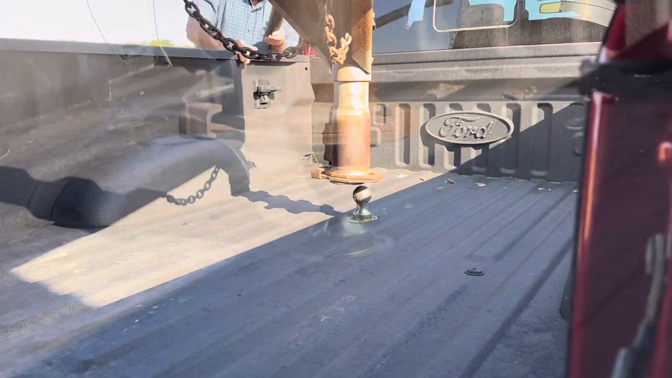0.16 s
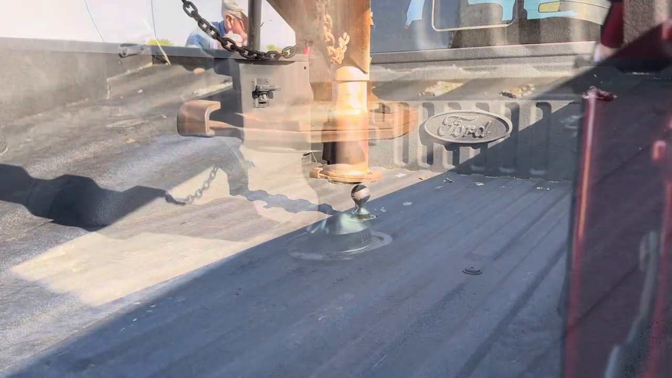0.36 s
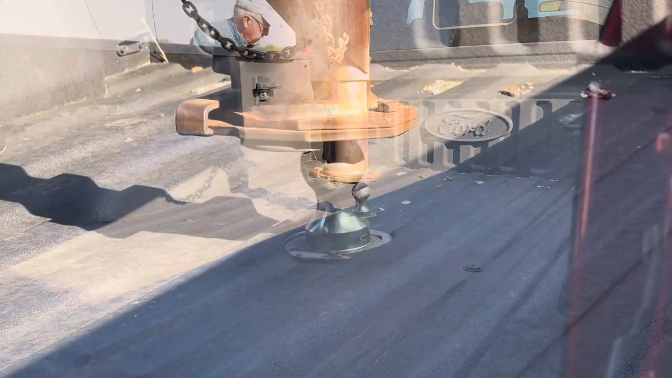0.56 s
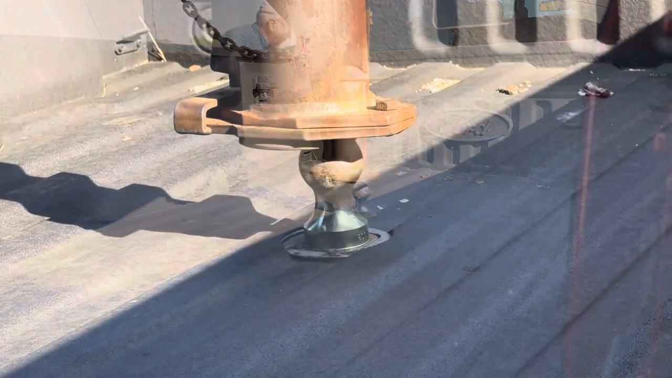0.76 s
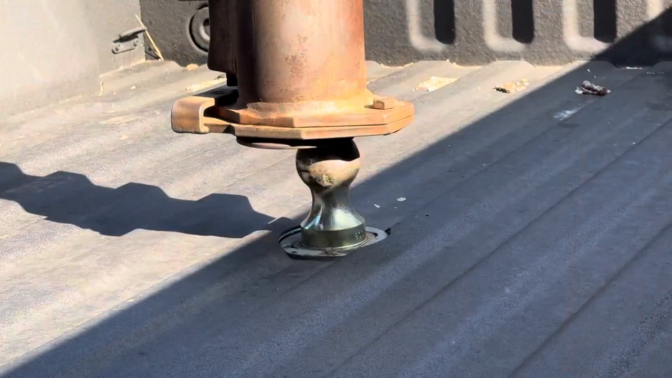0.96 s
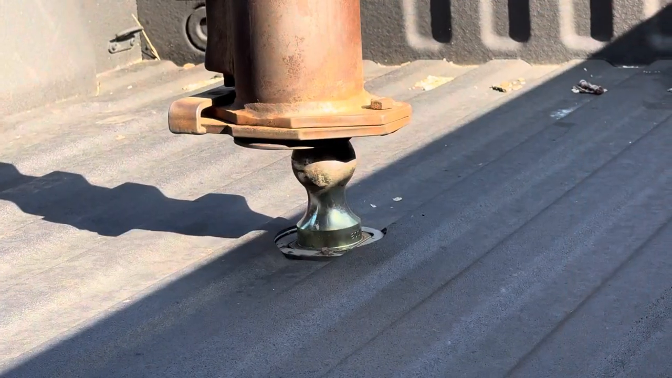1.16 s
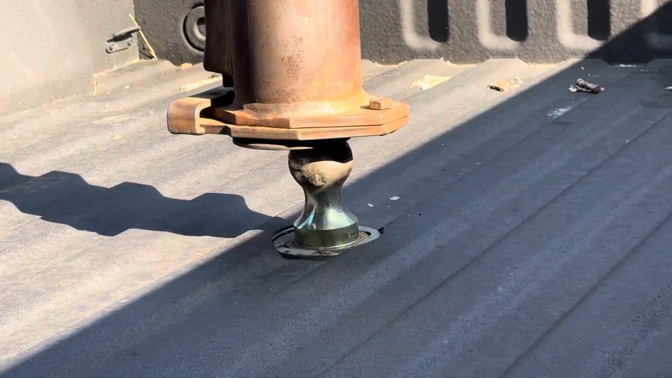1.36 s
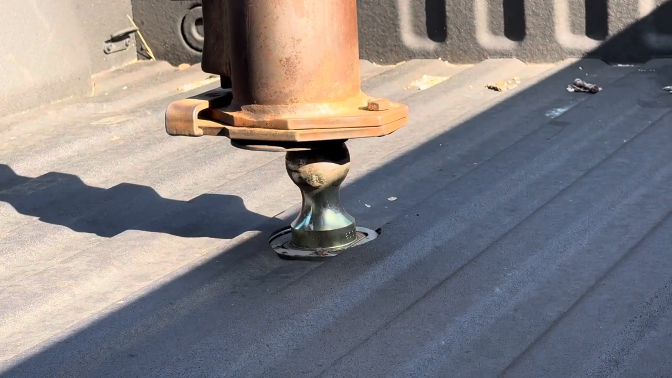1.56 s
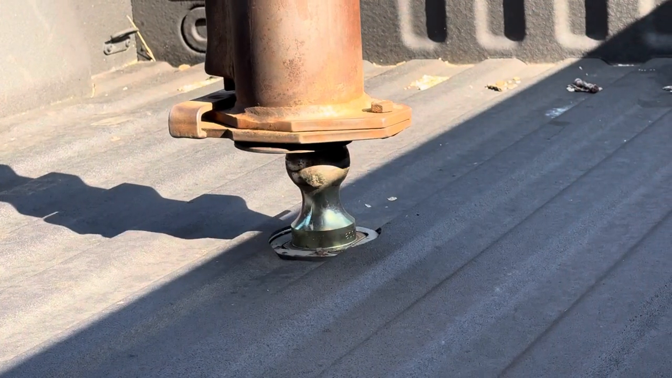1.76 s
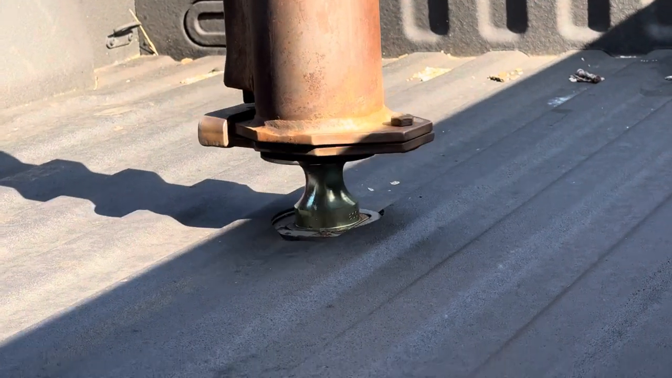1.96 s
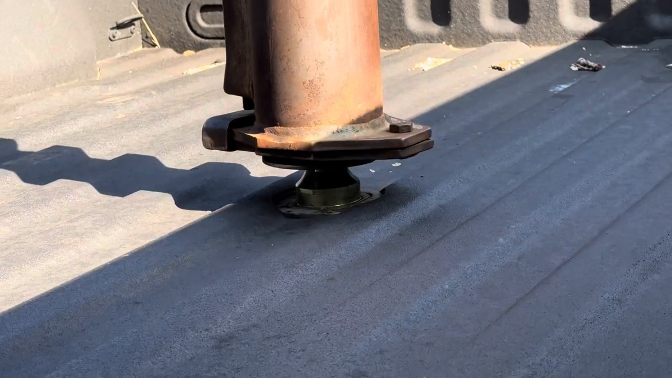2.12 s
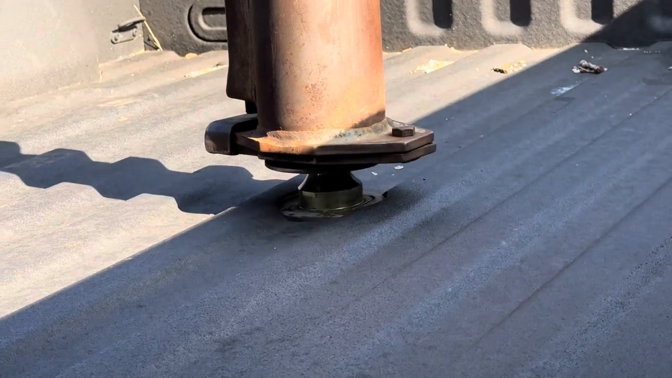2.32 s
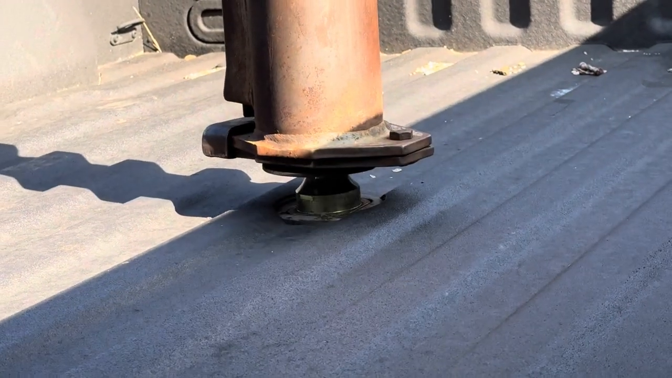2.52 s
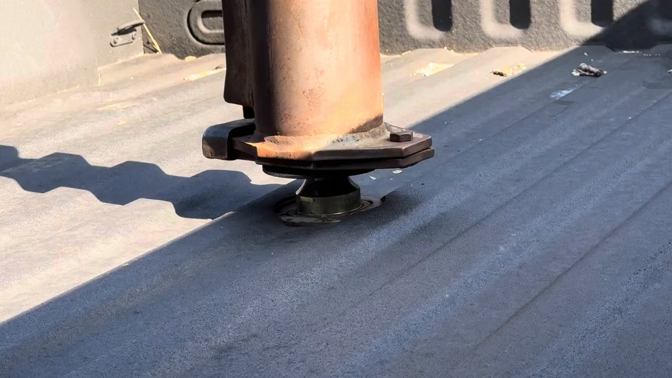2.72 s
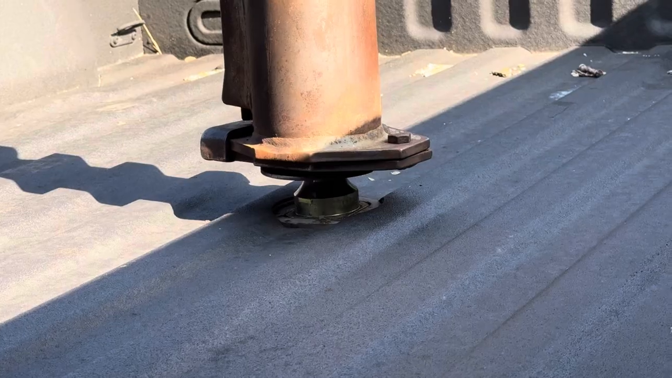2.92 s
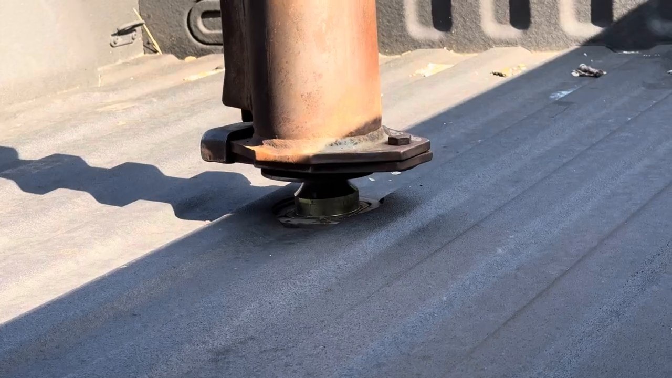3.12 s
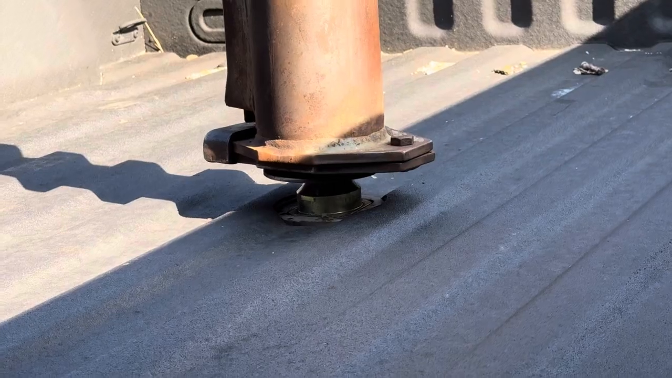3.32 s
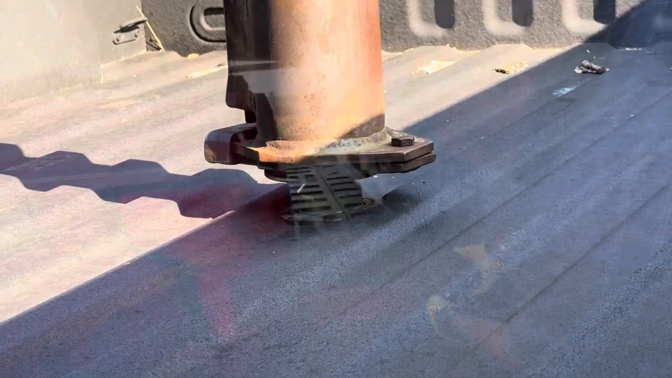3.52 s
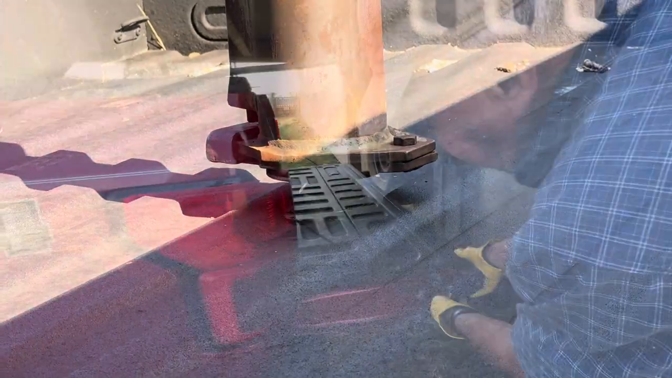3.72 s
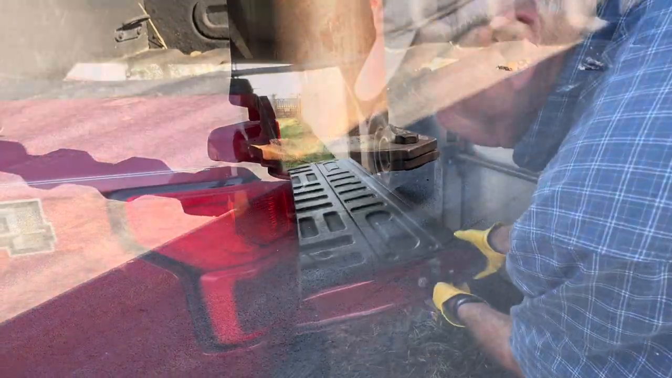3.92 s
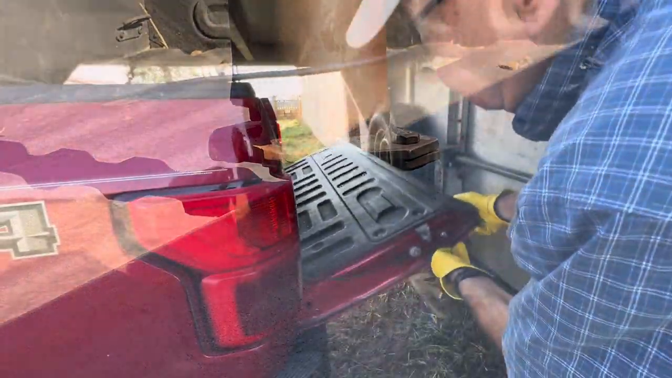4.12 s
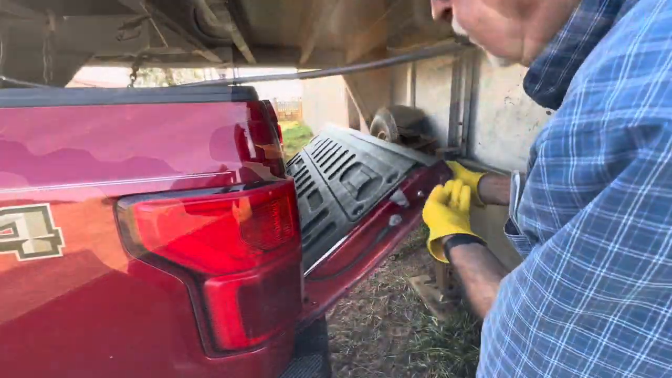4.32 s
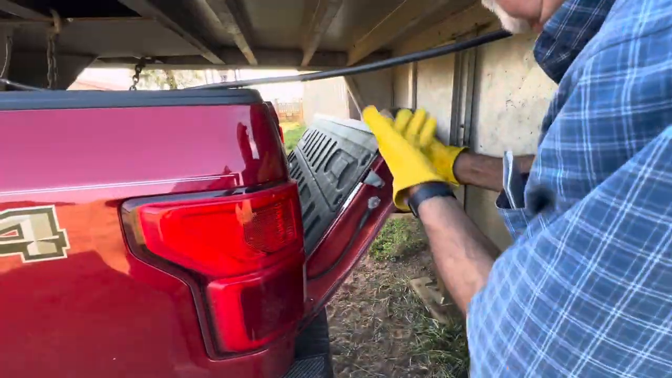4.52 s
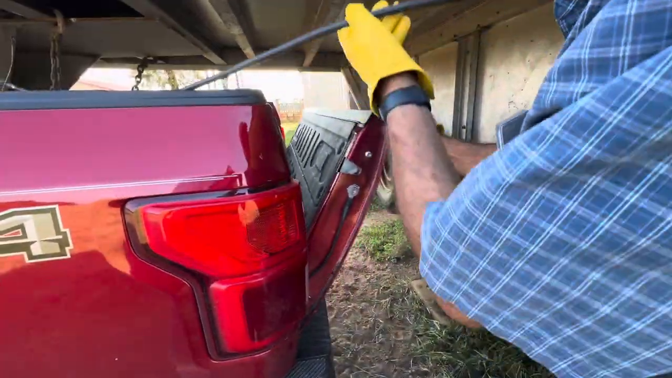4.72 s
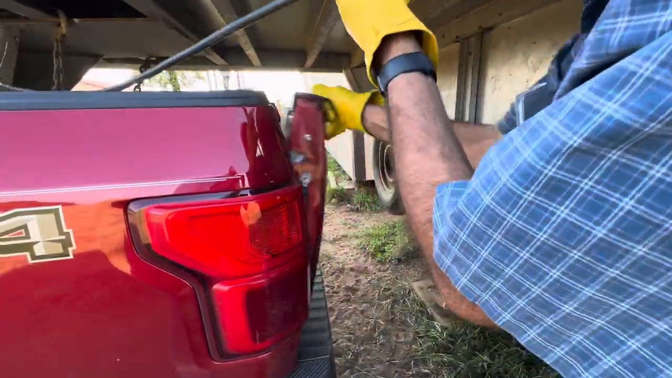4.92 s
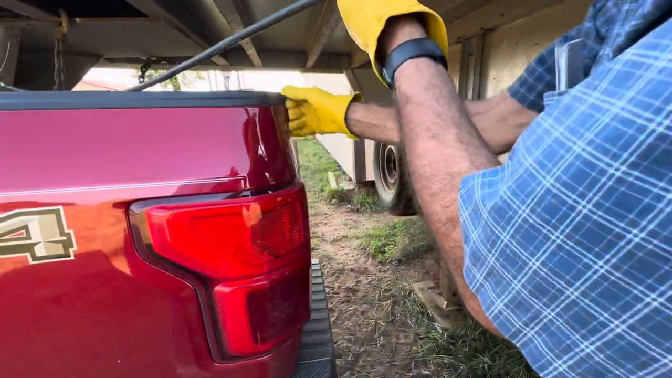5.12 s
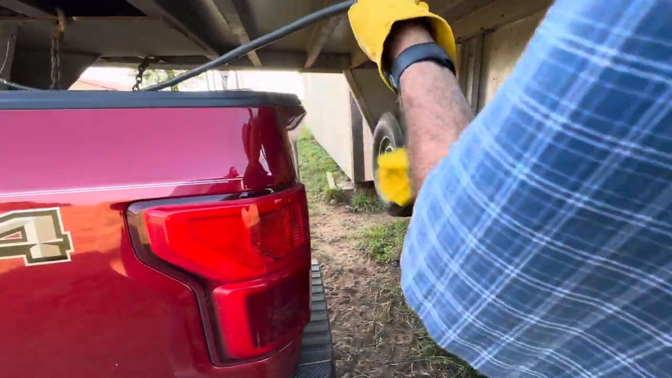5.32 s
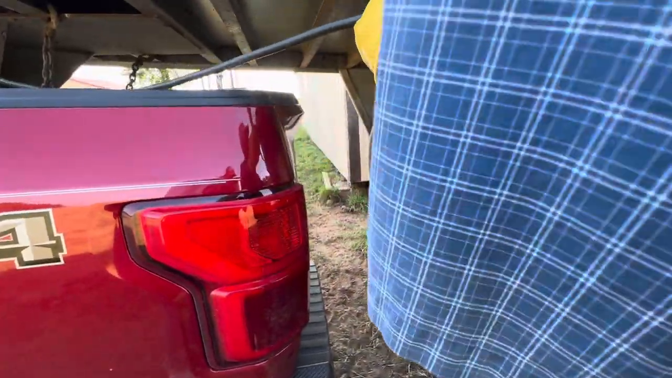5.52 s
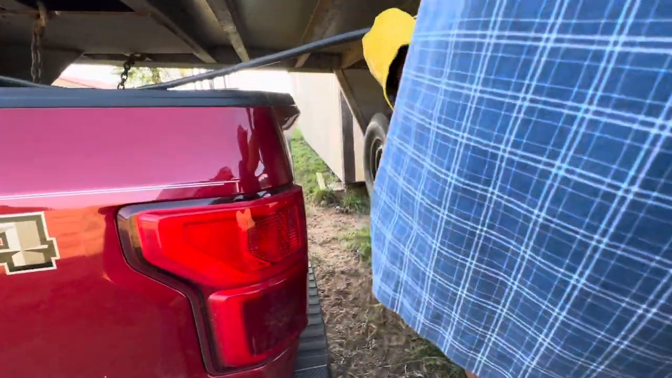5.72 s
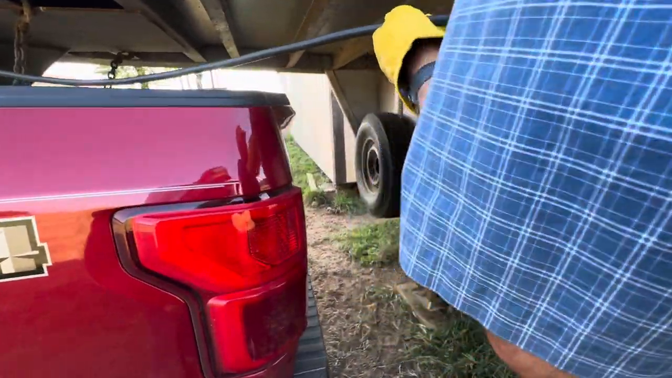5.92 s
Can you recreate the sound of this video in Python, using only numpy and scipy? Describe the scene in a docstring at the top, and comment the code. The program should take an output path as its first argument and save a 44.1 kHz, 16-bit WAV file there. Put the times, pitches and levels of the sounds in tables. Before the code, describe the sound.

Stereo microphone resting in a truck bed: low rumble, jolting thumps and rattling panels, then nearer, brighter steel clanks and squeaky, gritty sliding as a heavy coupler settles on a hitch ball. Brief panel groans and knocks fade. Outdoors at the tailgate, small clicks lead to one hard metal slam, with short rattle and ringing boom, leaving soft open air, low idling hum and a couple of small late clicks.

```python
"""A heavy steel coupler is wound down onto the ball in a pickup bed, heard from inside the bed: shaken noise
bands make the rumble, damped sines the knocks, noise-fed steel modes the scrapes, struck plates the clanks.
Random taps rattle loose sheet metal. Then, from beside the tailgate, the gate slams in bursts of banded
noise and a ringing boom, over a distant idling engine of two wavering tones and the open air of the yard."""
import sys
import numpy as np
from scipy import signal
from scipy.fft import rfft, irfft, next_fast_len
from scipy.io import wavfile
from scipy.ndimage import uniform_filter1d

SR = 44100
rng = np.random.default_rng(int(sys.argv[2]) if len(sys.argv) > 2 else 0)


def unload_audio(sound):
    """Save the sound as a 16-bit wav file, at the path given as the first command line argument."""
    columns = np.transpose(np.atleast_2d(sound))
    # keep every value between -1 and 1, then stretch to whole-number steps
    steps = np.round(np.clip(columns, -1, 1) * 32767)
    wavfile.write(sys.argv[1], SR, steps.astype(np.int16))


N = 267728
SIZE = next_fast_len(N)
SEC = np.arange(N) / SR
FREQ = np.maximum(np.fft.rfftfreq(SIZE, 1 / SR), 1)  # Hz

# modes of the clanking plates, which also sing under scraping: (f/Hz, level/dB, t60/s)
PLATES = [(1035, -9, .15), (1152, -8, .12), (1310, -1, .19), (1518, -8, .12), (1626, -4, .13),
          (1810, -9, .15), (2155, -6, .13), (2261, -8, .11), (2522, 3.5, .18), (2677, -3, .11),
          (2794, -9, .1), (3210, -8, .13), (3530, -5, .12), (3850, -9, .07), (4335, -6, .17),
          (4940, -2, .1), (5150, -5, .11), (5800, -6, .06), (6480, -8, .15), (7080, -8, .09)]
GATE_SHUT_S = 5.035


def undb(db):
    """Gain of a level in dB."""
    return 10 ** (np.asarray(db) / 20)


def unit(x):
    """Scale to rms 1."""
    return x / np.sqrt(np.mean(x ** 2))


def along(table):
    """Columns of a time curve at every sample."""
    s, *columns = np.transpose(table)
    return [np.interp(SEC, s, column) for column in columns]


def across(table):
    """Columns of a spectrum at every frequency, interpolated over log frequency."""
    hz, *columns = np.transpose(table)
    return [np.interp(np.log(FREQ), np.log(hz), column) for column in columns]


def noise(shape):
    """Noise of a given colour, rms 1."""
    spectrum = rfft(rng.standard_normal(SIZE)) * undb(across(shape)[0])
    return unit(irfft(spectrum, SIZE)[:N])


def even(x, span_s):
    """Take out the slow swells of a noise by dividing by its running rms."""
    k = int(span_s * SR)
    power = uniform_filter1d(uniform_filter1d(x * x, k), k)
    return x / np.sqrt(power + .02)


def walk(rate):
    """Random levels, one every 1 / rate s, smoothed twice over that time."""
    k = int(SR / rate)
    steps = np.repeat(rng.standard_normal(N // k + 1), k)
    return 1.3 * uniform_filter1d(uniform_filter1d(steps, k), k)[:N]


def ring(x, modes):
    """A bank of decaying two-pole modes driven by x."""
    out = 0
    for hz, db, t60 in modes:
        pole = np.exp(2j * np.pi * hz / SR - np.log(1000) / (max(t60, .01) * SR))
        out = out + undb(db) * signal.lfilter([0, pole.imag], [1, -2 * pole.real, abs(pole) ** 2], x)
    return out


def fall(start, t60, rise):
    """Envelope of a blow: a quick rise (time constant in s) and an exponential tail."""
    out, a = np.zeros(N), int(np.ceil(start * SR))
    t = SEC[a:a + int(1.3 * t60 * SR)] - start
    out[a:a + len(t)] = (1 - np.exp(-t / rise)) * np.exp(-np.log(1000) * t / t60)
    return out


def wide(make, side_db):
    """Mid and side from two unrelated draws."""
    return make() + undb(side_db) * make() * np.array([[1], [-1]])


def ramp(span):
    """0 before a span, 1 after it, a straight line between."""
    return np.interp(SEC, span, (0, 1))


def ports(x, far):
    """Two ports: a lead that turns with frequency, and a share that the bed walls scatter differently to each."""
    # microphone ports in the bed: (f/Hz, lead of the left/rad, scattered share/dB, the same at the far end/dB)
    port_table = [(49, 0.28, -18, -11), (130, 0.22, -16, -9), (310, 0.53, -24, -7.5), (720, 0.49, 2.5, -5),
                  (1520, 0.42, -4.5, 0.5), (2470, 0.016, -59, 2.5), (6870, 0.013, -72, -9),
                  (7840, 3.09, -31, -28), (9250, 3.2, -23, -24), (9760, 2.3, -21, -20),
                  (13500, 1.6, -17, -18), (16000, 1.9, -45, 8), (16600, 0.25, -9, -1)]
    lead, near_db, far_db = across(port_table)
    # a decaying noise with its spectrum evened: it blurs in time but hardly colours
    scatter = rfft(rng.standard_normal(N) * np.exp(-SEC / .03), SIZE)
    scatter = scatter / np.sqrt(uniform_filter1d(np.abs(scatter) ** 2, SIZE * 50 // SR))
    far = np.clip(far, 0, 1)
    near_part = rfft(x * (1 - far), SIZE) * undb(near_db)
    far_part = rfft(x * far, SIZE) * undb(far_db)
    side = irfft(scatter * (near_part + far_part), SIZE)[:N]
    spectrum = rfft(x, SIZE)
    return np.array([irfft(spectrum * np.exp(.5j * way * lead), SIZE)[:N] + way * side for way in (1, -1)])


def rumble(far):
    """Frame, floor panel and ribs shake together as noise bands; the ribs also take sharp jolts."""
    # shaking of bed and frame while the coupler moves: (t/s, frame level/dB, ribs over frame/dB)
    shaking = [(0.0, -35, -3.5), (0.19, -40, -5), (0.34, -33.5, -10.5), (0.7, -48.5, 2), (0.9, -44.5, 0),
               (1.15, -49.5, -6.5), (1.35, -47, -7), (1.39, -59.5, 1), (1.76, -55, -4.5), (1.82, -37, -8),
               (2.2, -37.5, -8), (2.68, -40.5, -9), (2.87, -48, -11), (3.15, -40, -11), (3.28, -53.5, 4),
               (3.45, -41, -14), (3.7, -57.5, -5), (4.4, -49, -15), (4.6, -61, -22), (4.95, -66, -33),
               (5.2, -95, -3)]
    # colours of frame, panel and ribs: (f/Hz, level/dB)
    frame_shape = [(22, -37), (45, 10), (65, 20), (95, 15), (130, 5), (250, -47)]
    panel_shape = [(60, -38), (110, 2), (150, 6.5), (220, 0.5), (320, -6), (700, -65)]
    ribs_shape = [(150, 1), (320, 4.5), (600, -4.5), (1000, -12), (2000, -28.5), (4000, -36)]
    # the slam shakes the truck again, higher parts die sooner; rows frame, panel, ribs: (level/dB, t60/s)
    slam_shake = [(-32.5, 1.78), (-33.5, 0.92), (-30, 0.4)]
    # sharp jolts in the ribs: (t/s, level/dB, crackle over level/dB)
    jolt_table = [(0.017, -36, 9), (0.049, -18.5, -15), (0.069, -36, -5), (0.113, -24, -4),
                  (0.132, -30.5, 10), (0.147, -23.5, -3), (0.161, -31, -3), (0.215, -39, 1),
                  (0.243, -50, -10), (0.27, -30, 5), (0.319, -23.5, 0), (0.36, -37, -3),
                  (0.422, -30.5, -11), (0.447, -24.5, -5), (0.475, -38, -13), (0.536, -34, 3.5),
                  (0.645, -35, -5), (0.68, -35.5, 1.5), (0.855, -52, -15), (1.277, -28, -11),
                  (1.774, -33, -10), (1.851, -37, 8), (1.929, -30.5, -18), (2.004, -27, 4),
                  (2.151, -25.5, -16), (2.205, -32, -16), (2.35, -30.5, -6), (2.632, -32, -2),
                  (2.929, -43.5, -7)]
    # colours of the jolts and of their crackle: (f/Hz, level/dB)
    jolt_shape = [(150, 2), (350, 11.5), (600, 7.5), (1000, -13.5), (1800, -30), (3000, -49)]
    crackle_shape = [(300, -22), (700, 20), (1100, 9.5), (1700, -10.5), (2400, -20), (4000, -32)]
    slam_rise_s = 0.014
    jolt_t60_s, jolt_rise_s = 0.074, 0.0037
    crackle_t60_s, crackle_rise_s = 0.026, 0.0033

    db, ribs_db = along(shaking)
    slam = [undb(slam_db) * fall(GATE_SHUT_S - slam_rise_s, t60, slam_rise_s) for slam_db, t60 in slam_shake]
    ribs = even(noise(ribs_shape), .03) * undb(2.5 * walk(70)) * (undb(db + ribs_db) + slam[2])
    jolts = sum(undb(jolt_db) * fall(s, jolt_t60_s, jolt_rise_s) for s, jolt_db, _ in jolt_table)
    crackle = sum(undb(jolt_db + over_db) * fall(s, crackle_t60_s, crackle_rise_s)
                  for s, jolt_db, over_db in jolt_table)
    # the panel lies between frame and ribs: its level over the frame follows that of the ribs
    panel_db = db + 0.5 + 0.51 * ribs_db
    panel = even(noise(panel_shape), .05) * undb(2 * walk(50)) * (undb(panel_db) + slam[1])
    # the frame sounds higher at the far end of the bed
    high = noise([(hz * 1.48, low_db) for hz, low_db in frame_shape])
    frame = even(far * high + (1 - far) * noise(frame_shape), .07) * (undb(db) + slam[0])
    shaken = undb(2 * walk(22)) * (frame + panel + ribs)
    return shaken + jolts * even(noise(jolt_shape), .006) + crackle * even(noise(crackle_shape), .003)


def bed_air(near, in_yard):
    """Coloured noise of the air in the bed, and a thin high hiss near the first place."""
    # colours of the air and of the hiss: (f/Hz, level/dB)
    air_shape = [(18, -38), (30, 14.5), (295, -7.5), (780, -25), (889, -16), (1280, -1), (1630, -29),
                 (1960, -11.5), (2170, -13.5), (8080, -26.5), (9460, -30), (10500, -19), (16000, -19.5)]
    hiss_shape = [(6000, -21), (9500, 10.5), (10700, 17.5), (12000, 10.5), (14500, -39), (16000, 17)]
    # the hiss sinking away: (t/s, level/dB)
    hiss_curve = [(0, -51), (.5, -58), (.85, -67), (1.0, -85)]
    far_db, near_db = -60.5, -63.5
    level = undb(far_db + (near_db - far_db) * near + 2 * walk(5.1)) * (1 - in_yard)
    return level * noise(air_shape) + undb(along(hiss_curve)[0]) * noise(hiss_shape)


def clatter():
    """Dense uneven taps ring loose sheet metal; two halves of its modes catch them in separate fits."""
    # force on the loose sheet metal of the bed: (t/s, level/dB)
    force_curve = [(0, -49), (.17, -50.5), (.22, -52.5), (.6, -59), (.9, -65.5), (1.3, -65.5), (1.42, -72),
                   (1.79, -76), (1.82, -45), (1.9, -48.5), (2.05, -51), (2.3, -57), (2.75, -59.5),
                   (3.0, -66), (3.35, -57.5), (3.7, -73.5), (5.0, -103), (5.05, -43), (5.2, -62),
                   (5.45, -73.5)]
    # modes of the sheet: f/Hz
    sheet_hz = [400, 510, 598, 703, 800, 933, 1050, 1155, 1290, 1403, 1515, 1625, 1794, 2030, 2140, 2280]
    taps_per_s, side_db = 1200, -5
    db_per_octave, cycles = -7.5, 64.5  # cycles until 60 dB down
    force = undb(along(force_curve)[0])
    span = slice(0, int(force_curve[-1][0] * SR))
    tap_band = signal.butter(2, (380, 2200), "band", fs=SR, output="sos")

    def sheet():
        """One draw of taps through all the sheet modes."""
        hits = rng.random(N) < taps_per_s / SR
        taps = hits * rng.standard_normal(N) * undb(2.5 * rng.exponential(size=N))
        taps = signal.sosfilt(tap_band, taps)
        modes = [(hz, db_per_octave * np.log2(hz / 1000), cycles / hz) for hz in sheet_hz]
        out = np.zeros(N)
        for half in (modes[::2], modes[1::2]):
            fitful = taps * undb(3 * walk(30))
            out[span] += ring((fitful * force)[span], half) / np.std(ring(taps[:SR], half))
        return out
    return wide(sheet, side_db)


def scrape():
    """Rough sliding contact feeds the tube's modes in fits and starts, and hisses a little itself."""
    # steel sliding on steel, one row a stroke:
    # (loudest t/s, build-up/s, dying/s, level/dB, upper modes over level/dB, favoured f/Hz)
    strokes = [(0.05, 0.032, 0.84, -74, 5, 4625), (0.147, 0.038, 0.2, -72, 15.5, 4625),
               (0.37, .04, 0.049, -81, -8, 1820), (0.968, 0.016, 0.15, -75.5, 23.5, 7400),
               (0.99, 0.12, 0.12, -68, 13, 5085), (1.0, 0.097, 0.24, -63, -12, 1200),
               (1.03, 0.042, 0.17, -72, -8, 4560), (.96, 0.25, 0.099, -67, 5, 3765),
               (1.27, .015, 0.21, -59.5, 0.5, 7240), (1.724, 0.031, 0.18, -71, -3, 4625),
               (1.874, 0.015, .17, -59, -22, 6700), (1.96, 0.29, 0.063, -63.5, 12, 6900),
               (2.666, 0.061, 0.15, -67, 6.5, 5712), (2.72, 0.23, 0.12, -65, 0, 1825),
               (2.68, 0.1, 0.047, -77, -10, 2120), (2.73, 0.037, 0.12, -69.5, -7, 6400),
               (3.051, 0.17, 0.21, -63, 7.5, 6900), (3.12, 0.099, 0.035, -59, 3, 6400),
               (3.178, 0.013, 0.21, -58, 7, 6700), (3.59, .015, 0.062, -83, 14, 6400),
               (3.11, 0.068, 0.035, -70, -8, 4625), (3.13, .05, 0.068, -82, -10, 2430),
               (3.63, 0.16, 0.078, -71, 0, 1825), (3.61, .04, 0.021, -74, -3, 2430),
               (3.93, 0.17, 0.18, -77.5, 5, 5420), (4.31, 0.085, 0.032, -79, -2, 2430)]
    # free ring of the coupler tube: (f/Hz, level/dB, t60/s)
    steel = [(1200, -4, .12), (1825, -5, .3), (2120, -7, .3), (2430, -6, .25), (2860, -11, .2),
             (3765, -5, .25), (4625, -3, .25), (5085, -1, .3), (5712, -3, .25), (6400, -5, .25),
             (7080, -6, .25), (7570, -2, .25), (8050, -4, .25), (8500, -4, .25), (9050, -4, .25),
             (9535, -4, .25), (9810, -5, .25), (10030, -5, .25), (10490, -4, .25), (10880, -4, .25),
             (11490, -4, .25), (12000, -2, .25), (12400, -4, .2), (12640, -5, .2), (13100, -3, .2),
             (13600, -7, .2), (14070, -1, .2), (14500, -8, .2), (14800, -3, .2), (15700, -5, .2)]
    edge_db, bend = -27.5, 1.45  # drop one build-up or dying time away from the loudest; its power law
    damping = 0.5  # share of the free t60 left under rubbing contact
    fits_db = 2.8  # how much the modes come and go
    plates_db = -8  # the plates sing along
    favour_db, favour_octaves = 11, .1  # each stroke presses on a spot that feeds one mode most

    grit = rng.standard_normal(N) * undb(3.0 * walk(300))
    press = np.zeros((len(strokes), N))
    for row, (s, build, dying, db, _, _) in zip(press, strokes):
        a, b = max(int((s - 2 * build) * SR), 0), int((s + 2 * dying) * SR)
        t = SEC[a:b]
        away = np.where(t < s, (s - t) / build, (t - s) / dying)
        row[a:b] = undb(db + edge_db * away ** bend)
    top_db, favoured = np.transpose(strokes)[4:]
    fits = [grit * undb(fits_db * walk(16)) for _ in range(4)]  # the modes share these four in turn
    out = undb(plates_db) * ring(press.sum(0) * grit, PLATES) / np.std(ring(grit[:SR], PLATES))
    # lower modes at the stroke's own level, upper modes over or under it
    for free, hiss_db, over_db in ((steel[:11], -12, 0 * top_db), (steel[11:], -8, top_db)):
        modes = [(hz, db, t60 * damping) for hz, db, t60 in free]
        edge = signal.butter(1, (modes[4][0], modes[-1][0]), "band", fs=SR, output="sos")
        scale = np.std(ring(grit[:SR], modes))
        force = undb(over_db) @ press
        for k, mode in enumerate(modes):
            octaves = np.log2(mode[0] / favoured)
            lift = undb(favour_db * np.exp(-(octaves / favour_octaves) ** 2)) - 1
            push = force + (lift * undb(over_db)) @ press if lift.max() > .01 else force
            out = out + ring(push * fits[k % 4], [mode]) / scale
        out = out + undb(hiss_db) * force * unit(signal.sosfilt(edge, grit))
    return out


def thuds():
    """Each knock is a few cycles of a damped panel."""
    # dull knocks through the bed: (t/s, level/dB, f/Hz)
    knocks = [(0.048, -8.5, 103.4), (0.136, -9.5, 138.4), (0.322, -20, 102.6), (0.448, -22.5, 120),
              (0.531, -21, 83), (0.631, -23.5, 82.6), (0.878, -29, 56.7), (1.194, -25.5, 122.5),
              (1.283, -20, 167), (1.807, -24, 71), (1.997, -50, 66), (2.213, -33, 61), (2.398, -15, 151),
              (2.434, -22.5, 69), (2.609, -18, 174), (3.188, -18.5, 68.4), (3.397, -16.5, 74),
              (3.62, -30, 66), (3.934, -29, 79), (4.201, -32, 79), (4.22, -19, 210), (4.302, -29, 146),
              (4.393, -29, 115), (4.417, -24, 160), (4.869, -33.5, 138)]
    cycles, rise_s = 8.2, 0.014  # cycles until 60 dB down
    return sum(undb(db) * fall(s, cycles / hz, rise_s) * np.sin(2 * np.pi * hz * (SEC - s))
               for s, db, hz in knocks)


def clanks():
    """Each blow: a crack with a noisy tail, and the plates ringing in a slightly new mix."""
    # steel on steel: (t/s, level/dB, tilt/dB per octave, ring peak over level/dB)
    blows = [(0.4289, -44, 6, -22), (0.452, -39.5, -2.5, -20), (0.554, -36, -2.5, -4.5),
             (0.6245, -52, 4, 1), (1.126, -34.5, -3.5, -29), (1.1766, -37, -1, -7),
             (1.2472, -19.5, -0.5, -6), (1.53, -40.5, 26, -21), (1.604, -48, -6, -8.5),
             (1.7764, -35.5, 14, -15), (1.799, -8.5, -4, -24.5), (1.935, -25.5, -2, -12),
             (1.9945, -29, -14, -9.5), (2.087, -46, -10, -7), (2.143, -31.5, -20, -11),
             (2.3824, -28.5, -3.5, -8.5), (3.007, -45, -9, -3), (3.047, -18.5, 2, -6.5),
             (3.214, -32.5, 6, -31), (3.56, -21.5, -0.5, -7), (4.1525, -29.5, -2, -6.5)]
    # colour of the crack: (f/Hz, level/dB)
    crack_shape = [(400, -23), (1000, -13), (1400, -4.5), (1950, -5.5), (2550, -5.5), (3000, -6.5),
                   (3600, -6.5), (4100, -7), (5000, -10.5), (5800, -9.5), (7200, -7.5), (10000, -18),
                   (16000, -20)]
    crack_db, crack_t60_s = -20, 0.23  # over the level of the blow
    chatter_db, chatter_t60_s = -28, .05  # the plates chatter against each other after the blow
    out = np.zeros(N)
    chance = 1.5 * rng.standard_normal((len(blows), len(PLATES)))  # dB
    dull, bright = (noise([(hz, db + way * np.log2(hz / 2500)) for hz, db in crack_shape]) for way in (-4, 4))
    for (s, db, tilt, ring_db), mix in zip(blows, chance):
        share = np.clip(.5 + tilt / 8, 0, 1)  # of the bright noise
        a, b = int(s * SR), int((s + .4) * SR)
        tail = (np.sqrt(1 - share) * dull + np.sqrt(share) * bright) * fall(s, crack_t60_s, 0.00041)
        chatter = undb(chatter_db) * (bright * fall(s, chatter_t60_s, 0.0015))[a:b]
        blow = chatter + signal.unit_impulse(len(out[a:b]))
        modes = [(hz * (1 + .002 * c), mode_db + c + tilt / 2 * np.log2(hz / 2500), t60)
                 for (hz, mode_db, t60), c in zip(PLATES, mix)]
        rung = ring(blow, modes)
        out += undb(db + crack_db) * tail
        out[a:b] += undb(db + ring_db) * rung / np.abs(rung).max()
    return out


def groans():
    """Short, slightly unsteady panel tones."""
    # the floor panel groans: (t/s, length/s, f/Hz, level/dB)
    tones = [(2.1, .12, 360, -48), (2.655, .08, 484, -42), (2.63, .1, 240, -46), (2.62, .09, 960, -58),
             (2.88, .14, 185, -48)]
    out = 0
    for s, length, hz, db in tones:
        swell = np.sin(np.pi * np.clip((SEC - s) / length, 0, 1))
        out = out + undb(db + 1.0 * walk(48.9)) * swell * np.sin(2 * np.pi * hz * SEC)
    return out


def yard_air(in_yard):
    """Open air beside the tailgate: wide, coloured noise with a slowly wandering level."""
    # colour of the open air: (f/Hz, level/dB)
    air_shape = [(30, -3.5), (70, 4), (200, -1), (480, -8), (780, -5.5), (960, -15.5), (1200, -8),
                 (1450, -16.5), (1650, -12.5), (2500, -18.5), (4000, -28), (6000, -32.5), (7400, -19),
                 (10500, -32), (13000, -30.5), (16000, -29)]
    return in_yard * undb(-61 + 0.62 * walk(4.5)) * wide(lambda: noise(air_shape), 0.43)


def idle():
    """Slightly wavering engine orders, nearer the right port; faint at first, they come up in the yard."""
    # engine orders: (f/Hz, level before the fade/dB)
    orders = [(64.6, -52.5), (193.8, -68)]
    # fade of the engine: (t/s, level/dB)
    fade = [(4.3, -20), (4.7, -6.5), (5.5, 1), (6.07, 3.5)]
    hum = 0
    for hz, db in orders:
        level = undb(db + 2.8 * walk(6.0))
        turns = hz * np.cumsum(1 + 0.00552 * walk(6.6)) / SR
        hum = hum + level * np.sin(2 * np.pi * turns)
    return hum * undb(along(fade)[0] + np.array([[-3.0], [3.0]]))


def gate():
    """Latches click and rattle, each part a noise band with its own tail, and the panel booms in modes."""
    # parts of the tailgate slam: (t/s, level/dB, t60/s, centre f/Hz, nominal width/Hz, left minus right/dB)
    parts = [(4.841, -55.5, 0.11, 1430, 2160, 5), (4.914, -59.5, 0.16, 1490, 2200, 7),
             (4.958, -54.5, 0.33, 845, 400, 1), (4.998, -41, 0.32, 3060, 6440, 5.5),
             (4.998, -35.5, 0.32, 1280, 398, -1), (5.004, -32.5, 0.27, 700, 257, -1),
             (5.002, -44, .25, 280, 300, 4), (5.02, -32.5, 0.081, 9900, 12100, -1),
             (5.019, -36, 0.083, 4870, 400, 15), (5.021, -38.5, .13, 3530, 500, 13),
             (5.033, -37.5, 0.19, 2300, 1480, 2), (5.04, -28.5, 0.15, 820, 322, 6.5),
             (5.044, -42, 0.087, 4500, 7000, 11), (5.057, -54, .08, 2740, 2500, 2),
             (5.06, -43, 0.31, 613, 500, 8), (5.09, -58, 0.86, 730, 570, 7),
             (4.876, -57, 0.23, 253, 250, 15), (5.065, -46.5, 0.27, 3160, 5760, 9.5),
             (5.582, -51.5, 0.23, 560, 302, -2), (5.947, -42.5, 0.069, 920, 446, -2)]
    # modes of the booming panel: (f/Hz, level/dB, t60/s)
    boom_modes = [(80, -31, 1.7), (142.3, -3, 1.2), (205.5, 6.5, 0.56)]
    boom_db = -26  # peak
    rise_share, rattle_db = 0.014, 1  # rise time over t60; depth of the rattle
    out, rattle = np.zeros((2, N)), undb(rattle_db * walk(120))
    for s, db, t60, hz, width_hz, pan_db in parts:
        top_hz = hz + width_hz / 2
        edges = hz * hz / top_hz, min(top_hz, .45 * SR)
        band = signal.butter(2, edges, "band", fs=SR, output="sos")
        part = slice(int(s * SR), min(int((s + 1.3 * t60) * SR), N))
        tail = (rattle * fall(s, t60, rise_share * t60))[part]

        def grain():
            """One draw of evened noise in the band."""
            return even(unit(signal.sosfilt(band, rng.standard_normal(SR))), .015)[-len(tail):]
        sides_db = np.array([[pan_db], [-pan_db]]) / 2
        out[:, part] += undb(db + sides_db) * tail * wide(grain, -5)
    boom = ring(np.gradient(fall(GATE_SHUT_S, .02, .002)), boom_modes)
    return out + undb(boom_db) * boom / np.abs(boom).max()


def scene():
    """Three listening places crossfade: the far end of the bed, near the ball, then the yard."""
    near, in_yard = ramp((0.5, 0.98)), ramp((3.47, 4.31))
    far = 0.97 * (1 - near)
    in_bed = rumble(far) + thuds() + groans() + scrape() + clanks() + bed_air(near, in_yard)
    truck = ports(in_bed, far) + clatter()
    # from the yard the bed lies to the right: 6.5 dB between the sides
    pan_db = ramp((4.3, 4.45)) * -6.5 * np.array([[.5], [-.5]])
    return truck * undb(pan_db) + gate() + idle() + yard_air(in_yard)


def record(dry):
    """The top ends steeply: a low-pass at 15.9 kHz."""
    return signal.sosfilt(signal.ellip(10, .2, 80, 15900, fs=SR, output="sos"), dry)


dry = scene()
out = record(dry)
unload_audio(out)
```